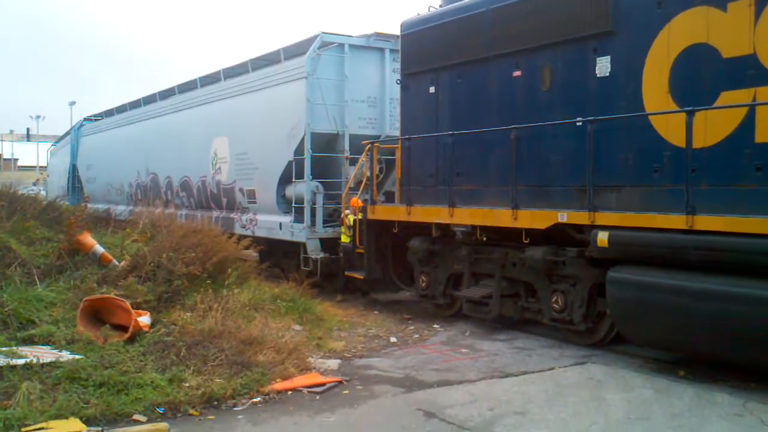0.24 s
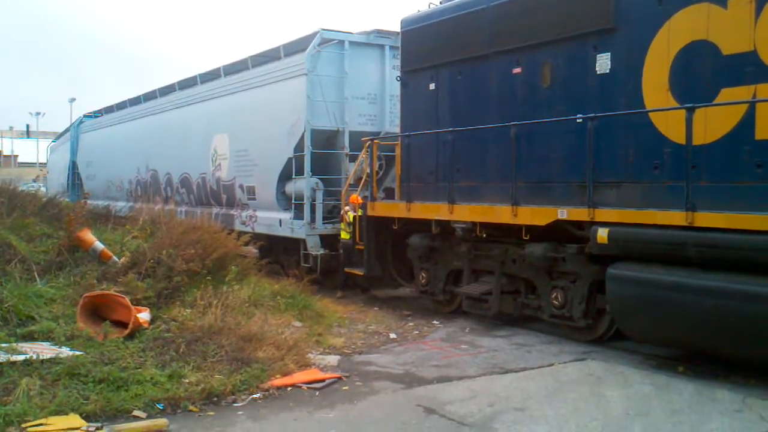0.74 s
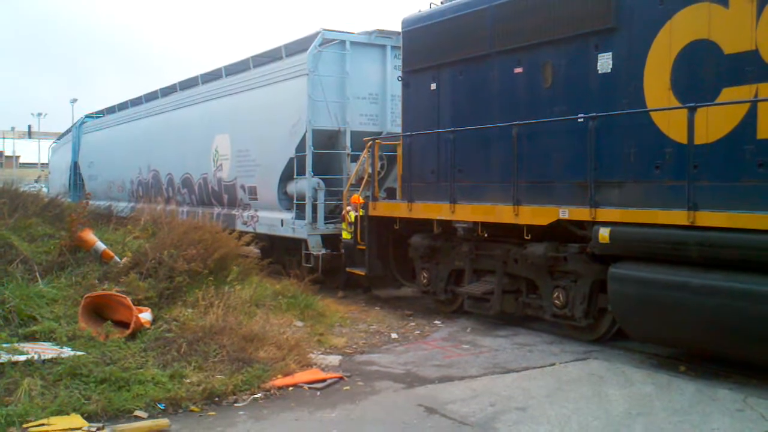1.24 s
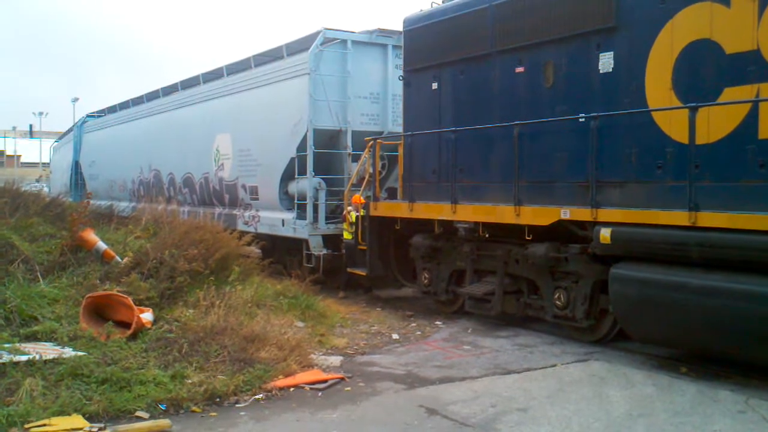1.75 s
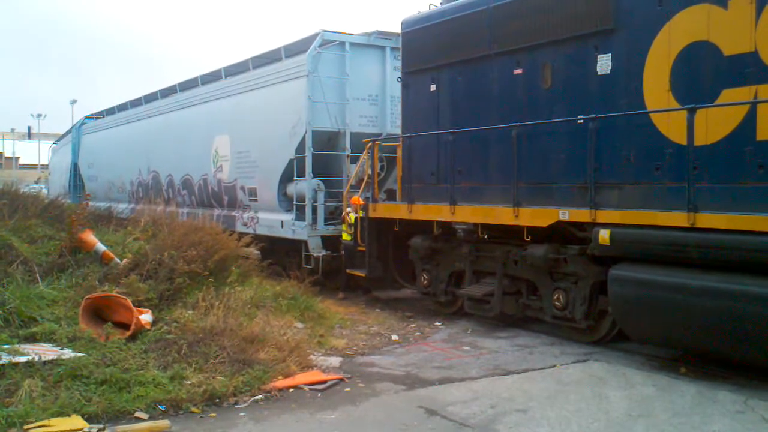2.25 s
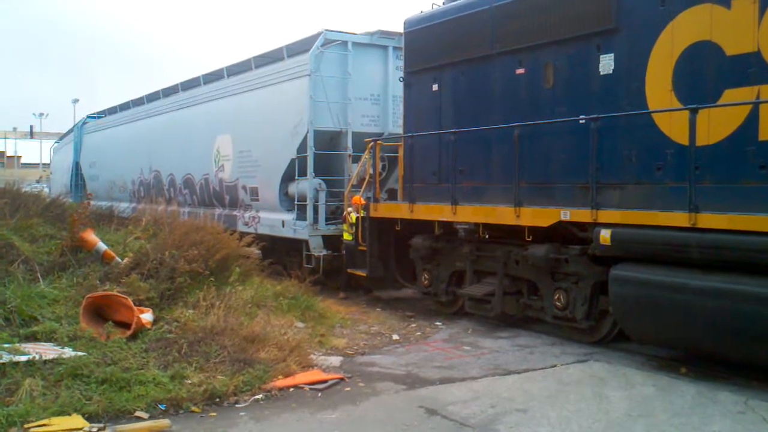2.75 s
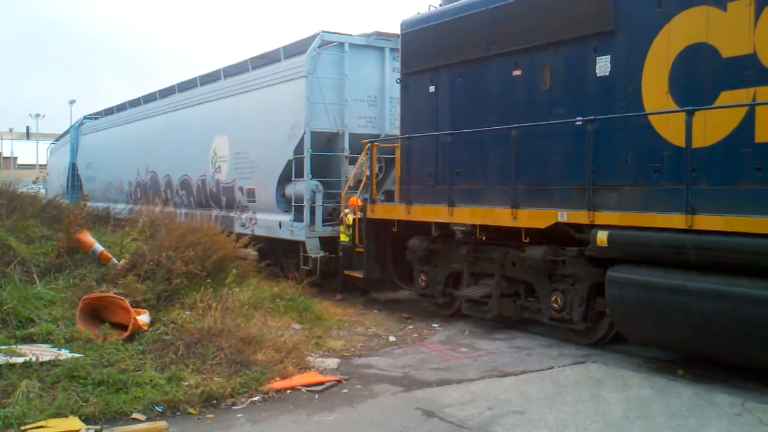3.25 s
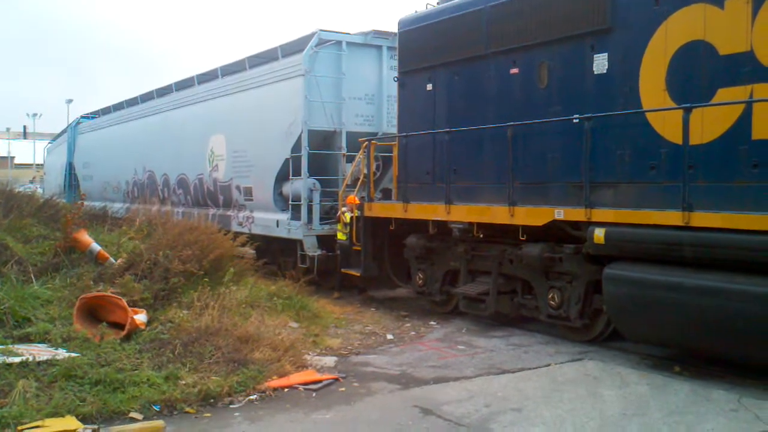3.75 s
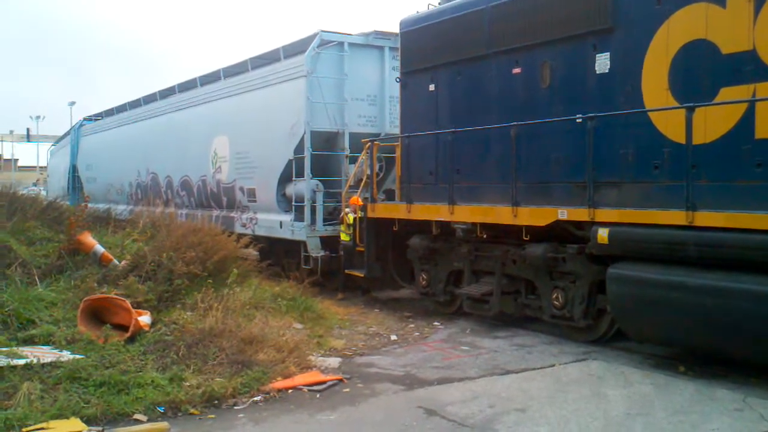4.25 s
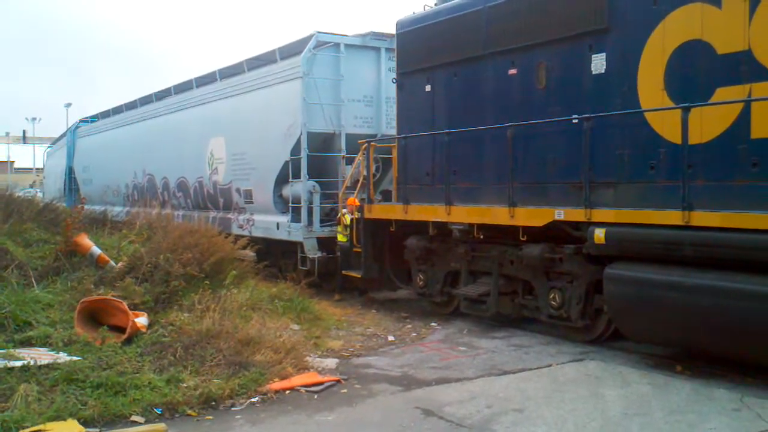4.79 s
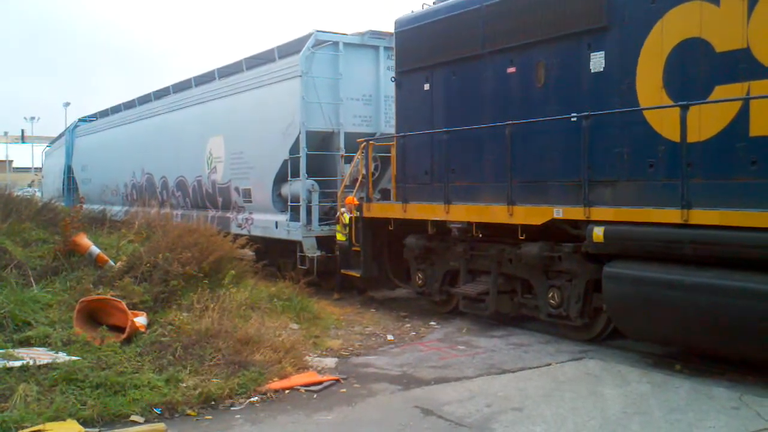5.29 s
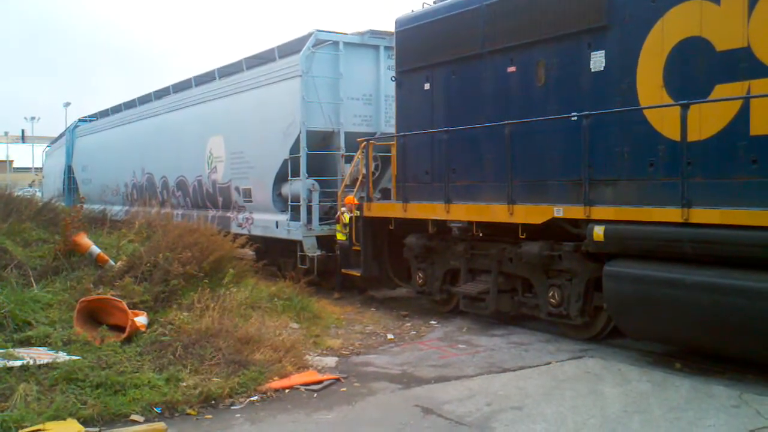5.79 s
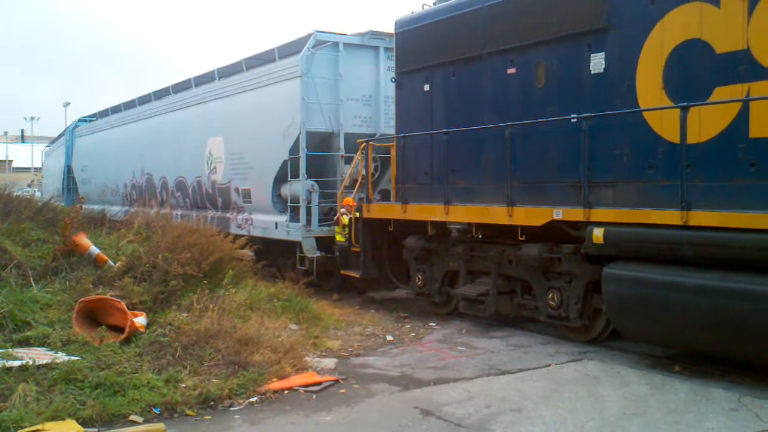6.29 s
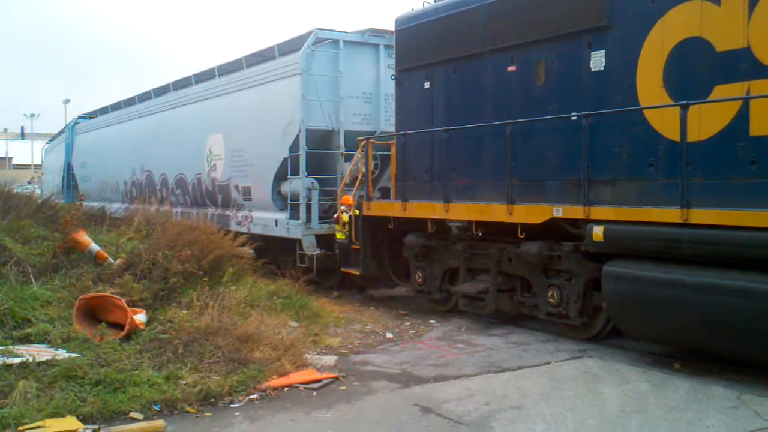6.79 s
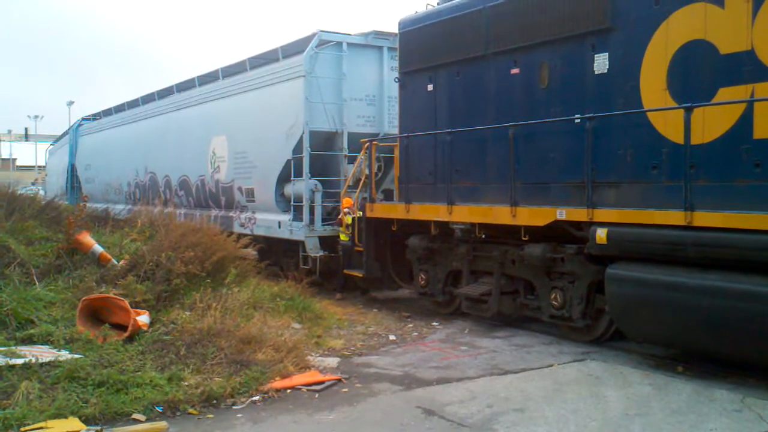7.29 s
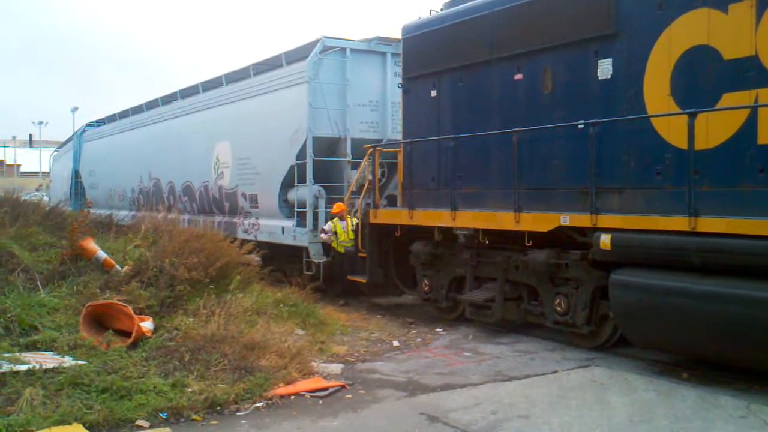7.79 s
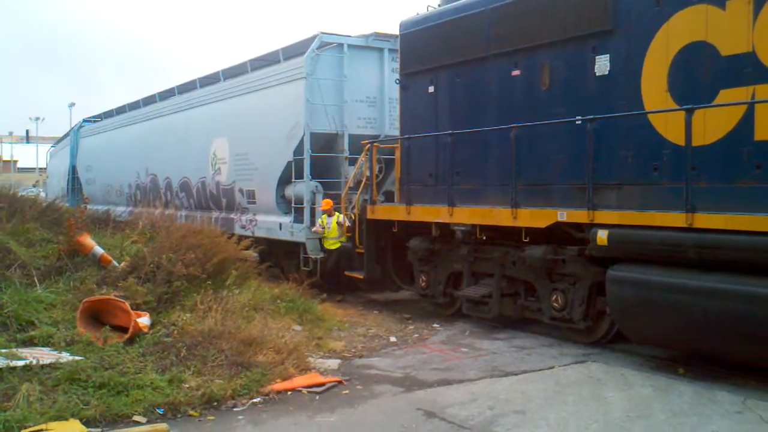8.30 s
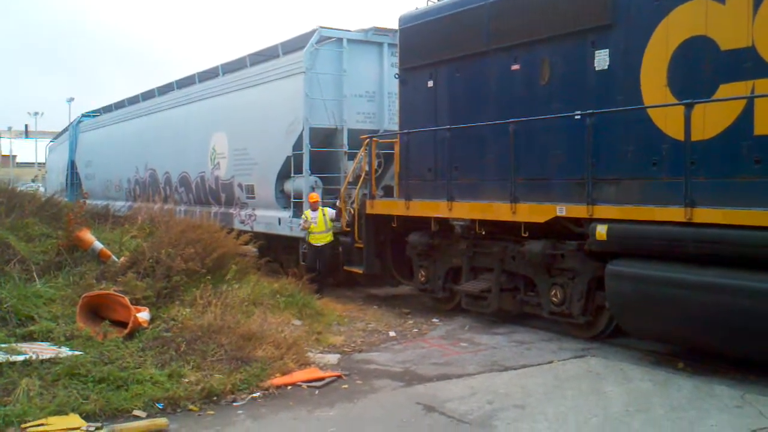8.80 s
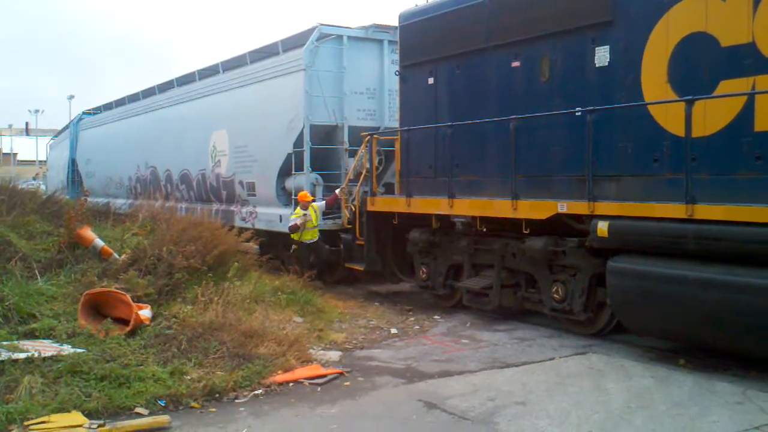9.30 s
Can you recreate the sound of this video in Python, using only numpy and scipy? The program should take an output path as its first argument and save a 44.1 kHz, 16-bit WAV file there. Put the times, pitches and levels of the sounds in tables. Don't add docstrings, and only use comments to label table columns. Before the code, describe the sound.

A large diesel engine idles close by with a steady rumble and high whine, until one loud air blast briefly ducks the sound.

```python
import sys
import numpy as np
from scipy import signal
from scipy.fft import rfft, irfft, next_fast_len
from scipy.io import wavfile
from scipy.ndimage import uniform_filter1d

SR = 44100
rng = np.random.default_rng(int(sys.argv[2]) if len(sys.argv) > 2 else 0)


def dump_mix(stems):
    frames = np.atleast_2d(stems).T
    limited = np.clip(frames, -1, 1)
    pcm = np.round(limited * 32767).astype(np.int16)
    wavfile.write(sys.argv[1], SR, pcm)


def field_ratio(decibels):
    return 10 ** (np.asarray(decibels, dtype=float) / 20)


N = 420713


def curve(rows):
    return np.interp(np.arange(N) / SR, *np.transpose(rows))


def read(rows, hz, index=1):
    rows = np.array(rows)
    return np.interp(np.log(hz + 1), np.log(rows[:, 0] + 1), rows[:, index])


def slow(top_hz):
    t = np.arange(0, N, 256) / SR
    rates_hz = np.geomspace(.1, top_hz, 16)
    drift = sum(np.sin(2 * np.pi * (f * t + rng.random())) / np.sqrt(f) for f in rates_hz)
    return np.interp(np.arange(N), t * SR, drift / drift.std())


def hiss(colour_db):
    size = next_fast_len(N)
    hz = np.fft.rfftfreq(size, 1 / SR)
    white = rfft(rng.standard_normal((2, size)))
    return irfft(white * field_ratio(colour_db(hz)) * np.sqrt(SR / 2), size)[:, :N]


# hz, likeness (0-1), right_phase_lead_rad, left_over_right_db
PORTS = [(39.5, 0.4, 0.45, 4), (99, 0.82, -2.02, 4.5), (210, 0.34, -1.46, 9.5), (497, 0.9, -1.34, 4.5),
         (690, 1, -1.2, 6), (780, 1.3, -0.24, 3.5), (1090, 1, -0.84, -1.4), (1330, 0.8, 0.43, 2),
         (1710, 0.87, 0.19, 3.5), (2600, 0.9, -0.55, -0.3), (3870, 0.96, 0.37, 2), (5100, 0.5, -0.38, 1.4),
         (8500, 0.46, -0.11, -1.7), (14000, 0.35, -1.3, -2.5)]
PORT_LAG_S = .0003795


def ports(near, other, alike=None):
    size = next_fast_len(N + 2048)
    hz = np.fft.rfftfreq(size, 1 / SR)
    same = np.clip(read(PORTS, hz) if alike is None else alike, 0, 1)
    left = rfft(near, size)
    mixed = same * left + np.sqrt(1 - same ** 2) * rfft(other, size)
    turn = -np.exp(1j * (read(PORTS, hz, index=2) - 2 * np.pi * hz * PORT_LAG_S))
    right = mixed * turn / field_ratio(read(PORTS, hz, index=3))
    return irfft(np.array([left, right]), size)[:, :N]


CRANK_HZ, HUNT_HZ, HUNT_TURNS = 5.4038, .57, .00008


def crank():
    t = np.arange(N) / SR
    return CRANK_HZ * t + HUNT_TURNS * np.sin(2 * np.pi * HUNT_HZ * t)


# order (multiple of crank speed), level_db (rms)
EXHAUST = [(17, -42.1), (24, -45.8), (27, -47.4), (28, -44.7), (30, -45.3), (32, -44.7), (40, -48.6),
           (44, -45.1), (46, -47.3), (48, -42.1), (49, -40.2), (53, -37.7), (54, -45.4), (55, -45.6),
           (56, -42.2), (59, -43.0), (60, -45.8), (62, -48.5), (63, -46.0), (64, -46.2), (66, -46.4),
           (69, -45.5)]
# order (multiple of crank speed), level_db (rms)
BLOCK = [(72, -43.5), (76, -43.3), (82, -39.2), (90, -41.1), (92, -41.1), (93, -41.9), (94, -42.7),
         (95, -41.0), (97, -43.6), (100, -40.2), (104, -41.2), (106, -44.2), (109, -43.0), (110, -40.9),
         (111, -37.9), (113, -42.1), (115, -40.2), (117, -44.2), (118, -43.6), (119, -40.0), (121, -41.7),
         (122, -44.4), (124, -41.9), (127, -44.1), (142, -41.2), (144, -44.1), (146, -41.0), (154, -42.7),
         (158, -36.4)]
# pitch_hz, level_db (rms)
OTHER_ORDERS = [(45, -77), (65, -75), (90, -69.5), (140, -52.5), (220, -50), (300, -48), (450, -50.5),
                (650, -45.5), (850, -53), (1000, -66), (1300, -64), (1600, -58), (2000, -76), (2400, -87)]
FIRINGS = [1.4, -0.1, 0.8, 0.8, 0.1, -0.2, -1.7, 0.6, -0.9, -1.7, 1.1, 3.0, -0.8, -4.5, -1.8, -0.9]
# low_hz, high_hz, place (in the turn, 0-1), scatter_rad
KNOCKS = [(260, 330, .42, .9), (335, 390, .09, .8), (395, 510, .63, .9), (600, 690, .7, .8),
          (790, 880, .24, .9)]
THROB_ORDER, THROB_HZ, THROB_S, THROB_DB = 17, .603, .72, -44


def rumble(turns):
    size, order = 2 ** 13, np.arange(460)
    order_hz = order * CRANK_HZ
    uneven_db = 10 * np.log10(rng.exponential(1, (2, len(order))))
    level_db = read(OTHER_ORDERS, order_hz) + np.minimum(uneven_db, 3.0)
    for k, db in EXHAUST + BLOCK:
        level_db[:, int(k)] = db
    phase = 2 * np.pi * rng.random(level_db.shape)
    knock, chance = np.full(len(order), np.nan), rng.standard_normal(len(order))
    for low_hz, high_hz, place, scatter in KNOCKS:
        inside = (order_hz > low_hz) & (order_hz < high_hz)
        knock[inside] = (scatter * chance - 2 * np.pi * order * place)[inside]
    place_in_turn = np.arange(size) / size
    firing_places = np.arange(len(FIRINGS)) / len(FIRINGS)
    firing = field_ratio(np.interp(place_in_turn, firing_places, FIRINGS, period=1))
    for _ in range(12):
        phase = np.where(np.isnan(knock), phase, knock)
        phase[:, THROB_ORDER] = 0
        cycle = irfft(field_ratio(level_db) * np.exp(1j * phase), size) * size / np.sqrt(2)
        loudness = np.sqrt(uniform_filter1d(cycle ** 2, size // len(FIRINGS), mode="wrap"))
        phase = np.angle(rfft(cycle * firing / loudness)[:, :len(order)])
    fine_size = 8 * size
    fine = signal.resample(cycle, fine_size, axis=1)
    points = np.arange(fine_size)
    return ports(*(np.interp(turns * fine_size, points, c, period=fine_size) for c in fine))


def tones(table, turns, waver_db, wobble=0.):
    uneven = wobble * np.sin(2 * np.pi * turns)
    out = 0
    for ratio, db in table:
        level = np.sqrt(2) * field_ratio(db + waver_db * slow(3.))
        out = out + level * np.sin(2 * np.pi * (ratio * turns + rng.random()) + ratio * uneven)
    return out


# ratio, level_db (rms)
AUXILIARIES = [(7.96, -55.9), (22.81, -43.4), (24.31, -44.1), (33.43, -42.9), (100.79, -43.2),
               (102.15, -46.9), (201.59, -51.5), (236, -52), (237, -45), (238, -50), (302.38, -43.5),
               (316, -52), (339.08, -51.8), (395, -54.2), (440.25, -60)]
# ratio, level_db (rms)
GEAR_MESH = [(144.29, -40.4), (288.57, -40.7), (432.86, -45.1), (577.15, -57.0), (721.44, -65.1)]
# ratio, level_db (rms)
WHINE = [(262.13, -56.6), (272.41, -37.5), (278.86, -48.3), (282.22, -29.1), (295.59, -48.1),
         (554.35, -52.5), (564.34, -63.4), (826.6, -69.7), (836.69, -59.7), (846.63, -62.1),
         (847.83, -58.6), (856.86, -70.2), (1117.92, -59.5), (1118.99, -69.2), (1138.79, -71.8),
         (1391.34, -68.7), (1400.87, -70.1)]
# time_s, level_db
WHINE_SWELL = [(0, -5.5), (.9, -2.5), (1.5, -3), (2.1, 0.5), (2.5, -3), (3.5, 1), (4.5, 0), (5.2, 1),
               (5.9, 0.5), (6.8, -0.7), (8, 0), (9.6, -0.5)]


def machinery(turns):
    whine = field_ratio(curve(WHINE_SWELL)) * tones(WHINE, turns, 1.0, wobble=.0006)
    beat = THROB_HZ * (np.arange(N) / SR - THROB_S)
    fan = np.sqrt(2) * field_ratio(THROB_DB) * np.cos(2 * np.pi * (THROB_ORDER * turns + beat))
    mesh = tones(GEAR_MESH, turns, 1.3, wobble=.0015)
    together = tones(AUXILIARIES, turns, 0.96) + mesh + whine + fan
    return ports(together, together, alike=0.95)


# pitch_hz, level_db (per Hz)
ROAR = [(30, -85), (100, -58.5), (170, -59.5), (300, -58), (600, -55.5), (850, -60), (1100, -62.5),
        (1600, -64), (2000, -61), (2600, -74), (3600, -81), (5000, -85), (8500, -85.5), (13500, -97.5)]
# pitch_hz, width_hz, level_db (rms)
BLADES = [(1558, 270, -36), (2930, 1800, -49), (4580, 38, -57), (6075, 11, -56.5), (7610, 38, -60.5),
          (9200, 41, -61), (10500, 250, -70), (13700, 1500, -81)]


def roar():
    def colour_db(hz):
        power = field_ratio(read(ROAR, hz)) ** 2
        for centre_hz, width_hz, db in BLADES:
            shape = (1 + (2 * (hz - centre_hz) / width_hz) ** 2) ** 2
            power = power + field_ratio(db) ** 2 / (width_hz * np.pi / 2) / shape * 2
        return 10 * np.log10(power)
    return ports(*(hiss(colour_db) * field_ratio(0.11 * slow(8.))))


# start_s, length_s, level_db (rms), top_over_broad_db
LEAKS = [
    (3.3, 1.9, -52, -12),
    (7.0, 0.63, -49.5, -6),
]
LEAK_RISE_DB_PER_S, LEAK_FALL_DB_PER_S, SEEP_DB, SEEP_TOP_DB = 10, 36, -65, -62


def leak():
    t, out = np.arange(N) / SR, 0
    for top, (centre_hz, seep_db) in enumerate(((8200., SEEP_DB), (12500., SEEP_TOP_DB))):
        air = hiss(lambda hz: -12. * (np.log2((hz + 1) / centre_hz) / 0.44) ** 2)
        power = field_ratio(seep_db) ** 2
        for start_s, length_s, db, top_db in LEAKS:
            rise_db = LEAK_RISE_DB_PER_S * np.maximum(start_s - t, 0)
            fall_db = LEAK_FALL_DB_PER_S * np.maximum(t - start_s - length_s, 0)
            power = power + field_ratio(db + top * top_db - rise_db - fall_db) ** 2
        out = out + air / air.std() * np.sqrt(power)
    return ports(*out)


LIFT_S, OPEN_S, SHUT_S = 6.194, 6.2095, 6.303
OPEN_DB, BUILD_DB_PER_S, DIE_DB_PER_S = -21.5, 175, 420
YARD_DB, YARD_DB_PER_S = -16, 150
LIFT_DB, LIFT_LENGTH_S, SNAP_S, ROUND_S = -33, .011, .0035, .015


def blast():
    t = np.arange(N) / SR

    def ramp(start_s):
        return np.clip((t - start_s) / SNAP_S, 0, 1)
    after_shut_s = np.maximum(t - SHUT_S, 0)
    build_db = BUILD_DB_PER_S * (np.minimum(t, SHUT_S) - OPEN_S)
    jet_db = OPEN_DB + build_db - DIE_DB_PER_S * after_shut_s
    jet_db = uniform_filter1d(jet_db, max(int(ROUND_S * SR), 1))
    seat = field_ratio(LIFT_DB) * ramp(LIFT_S) * (1 - 0.74 * ramp(LIFT_S + LIFT_LENGTH_S)) * (t < SHUT_S)
    yard = field_ratio(YARD_DB - YARD_DB_PER_S * after_shut_s) * ramp(SHUT_S)
    return np.sqrt(seat ** 2 + (field_ratio(jet_db) * ramp(OPEN_S)) ** 2 + yard ** 2)


# pitch_hz, level_db
JET = [(300, -23), (1000, -15), (2000, -3), (3100, -7.5), (4800, -3.5), (6400, -1), (8100, -3), (9200, 2),
       (10300, -2.5), (12500, -4), (13600, -2), (15000, -70)]
# start_s, level_db (rms), centre_hz, t60_s
SPITS = [
    (3.77, -38.5, 8600, .2),
    (7.605, -31.5, 8500, .2),
]
FLUTTER_DB, EDDY_DB, GRIT_DB = 1.0, 2.0, 2.2


def valve():
    jet = hiss(lambda hz: read(JET, hz))
    _, _, cells = signal.stft(jet / jet.std(), SR, nperseg=256)
    streaks = rng.standard_normal(cells.shape[1:])
    streaks = uniform_filter1d(uniform_filter1d(streaks, 5, 0), 8, 1)
    jet = signal.istft(cells * field_ratio(EDDY_DB * streaks / streaks.std()), SR, nperseg=256)[1][:, :N]
    grit = uniform_filter1d(rng.standard_normal(N), 30)
    grit = grit / grit.std()
    jet *= blast() * field_ratio(FLUTTER_DB * slow(80.) + GRIT_DB * grit)
    t = np.arange(N) / SR
    for start_s, db, centre_hz, t60_s in SPITS:
        spit = hiss(lambda hz: np.maximum(-12. * (np.log2((hz + 1) / centre_hz) / .3) ** 2, -21.))
        age = np.maximum(t - start_s, 0)
        jet += spit / spit.std() * field_ratio(db - 60 * age / t60_s) * np.minimum(age / .012, 1)
    return ports(*jet, alike=.7)


LIMIT_DB, DUCK, LISTEN_S, REBOUND, RECOVER_DB_PER_S = -21.5, 1.153, 0.039, 0.091, 3


def gain_control(dry):
    keep = np.exp(-1 / (LISTEN_S * SR))
    power = signal.lfilter([1 - keep], [1, -keep], (dry ** 2).mean(0))
    over_db = 10 * np.log10(power + 1e-12) - LIMIT_DB
    fall_db = RECOVER_DB_PER_S * np.arange(N) / SR
    held_db = np.maximum.accumulate(over_db + fall_db) - fall_db
    cut_db = (1 - REBOUND) * held_db + REBOUND * np.maximum(over_db, 0)
    return dry / field_ratio(DUCK * np.maximum(cut_db, 0))


# which (0 sum, 1 difference), low_hz, high_hz,
# share (of the time, 0-1)
DROPPED = [(0, 2420, 2880, .96), (0, 4800, 5650, .62), (0, 7750, 8200, .27), (0, 10000, 10900, .33),
           (0, 12500, 13500, .35), (1, 3520, 4230, .9), (1, 6200, 6900, .42), (1, 8700, 9700, .18),
           (1, 11200, 12100, .18)]
EDGE_HZ = 13930


def joint_stereo(pair):
    left, right = pair
    hz, s, pair = signal.stft(np.array([left + right, left - right]) / 2, SR, nperseg=2048)
    chance = uniform_filter1d(rng.standard_normal((len(DROPPED), len(s))), 2, 1)
    loud = (s > OPEN_S) & (s < SHUT_S + .02)
    wider_hz = 150 * loud
    held = np.arange(len(s)) // 3 * 3
    for (which, low_hz, high_hz, share), draw in zip(DROPPED, chance):
        steps = rng.choice([0, 0, 0, .2, .45], (2, len(s)))[:, held]
        ragged_hz = (high_hz - low_hz) * steps * (share < .8)
        above = hz[:, None] > low_hz - wider_hz + ragged_hz[0]
        below = hz[:, None] < high_hz + wider_hz - ragged_hz[1]
        absent = np.where(loud, share > .8, draw < np.quantile(draw, share))
        pair[which] *= 1 - .98 * (above & below) * absent
    pair *= np.clip((EDGE_HZ - hz) / 80 + 1, .01, 1)[:, None]
    total, difference = signal.istft(pair, SR, nperseg=2048)[1][:, :N]
    return np.array([total + difference, total - difference])


def scene():
    turns = crank()
    return rumble(turns) + machinery(turns) + roar() + leak() + valve()


def low_pass(x):
    return signal.sosfilt(signal.butter(12, 14100, fs=SR, output="sos"), x)


def record(dry):
    mix = joint_stereo(gain_control(dry))
    return low_pass(mix)


dry = scene()
out = record(dry)
dump_mix(out)
```